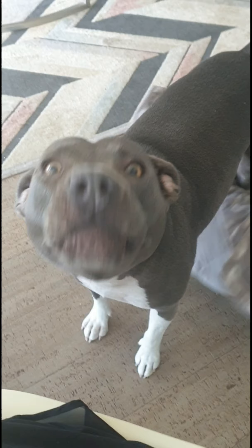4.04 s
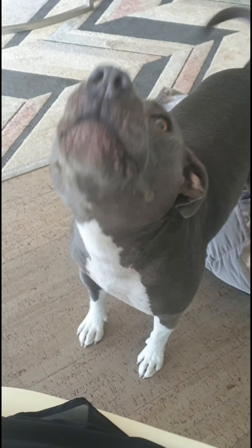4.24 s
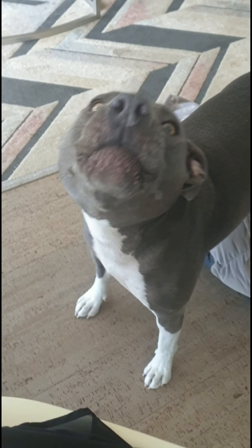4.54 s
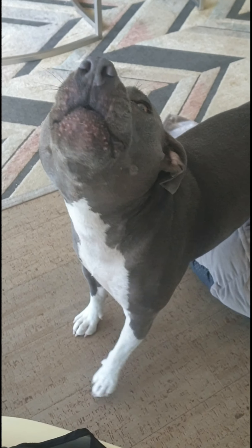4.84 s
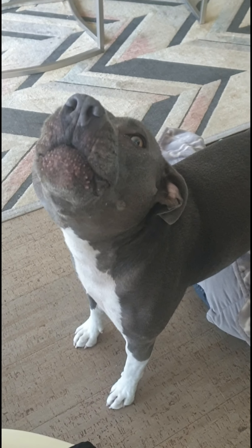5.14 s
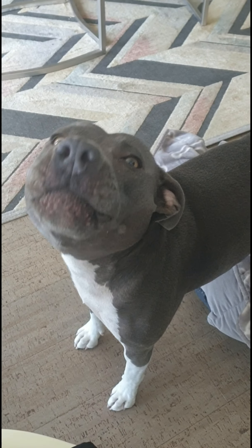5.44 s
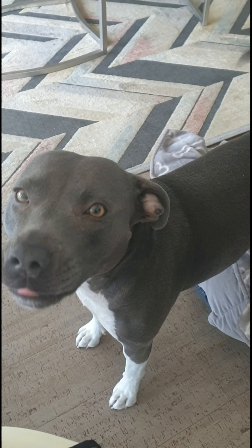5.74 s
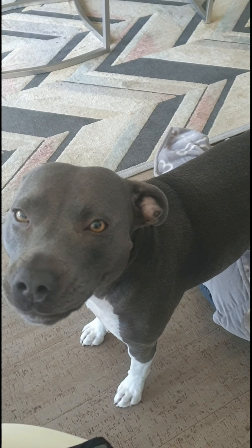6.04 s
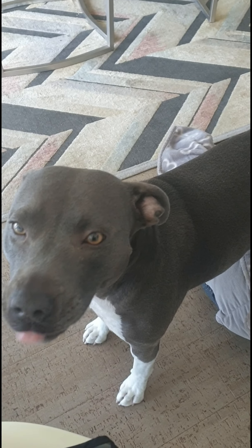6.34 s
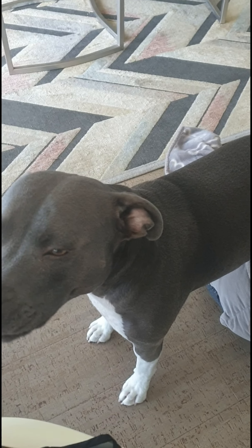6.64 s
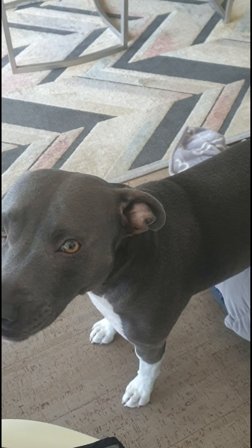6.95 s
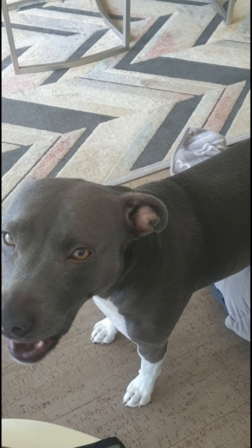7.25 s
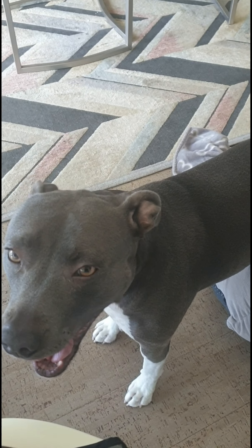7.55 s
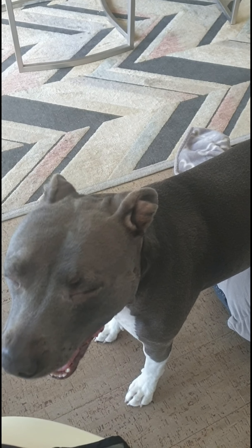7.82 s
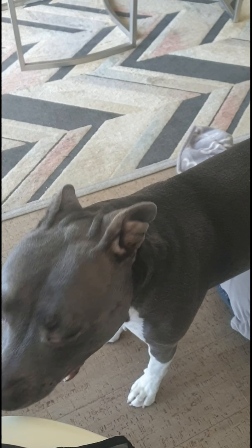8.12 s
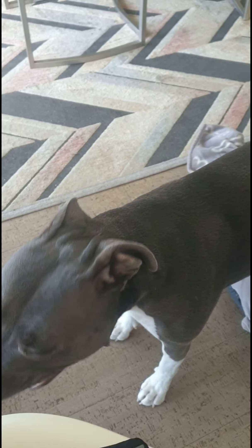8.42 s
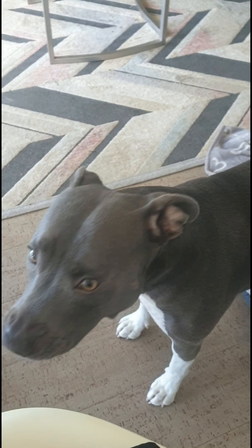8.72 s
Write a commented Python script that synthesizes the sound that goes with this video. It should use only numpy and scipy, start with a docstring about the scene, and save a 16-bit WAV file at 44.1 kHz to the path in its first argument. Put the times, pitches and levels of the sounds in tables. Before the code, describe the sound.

Close, high dog whines and thin nose whistles, one sharp mouth snap, and a quavering howl ending in a snort indoors.

```python
"""Dog whining in a living room.

Close to a phone, a dog whistles thinly through its nose (air jets) and voices high whines, a quick
yodel and a long wavering howl (vocal folds) that turns hoarse and ends in a snort. Air hisses in
its nostrils; it sniffs, licks its lips and snaps its mouth once, sharply. The room rings briefly
over a low rumble."""
import sys
import numpy as np
from scipy import signal
from scipy.fft import rfft, irfft
from scipy.io import wavfile
from scipy.ndimage import uniform_filter1d

SR = 44100
rng = np.random.default_rng(int(sys.argv[2]) if len(sys.argv) > 2 else 0)


def unload_wav(signal):
    """Save mono or channel-first audio to the path in sys.argv[1] as 16-bit WAV at rate SR, clipped to [-1, 1]."""
    wavfile.write(
        sys.argv[1],
        SR,
        np.round(np.clip(np.atleast_2d(signal).T, -1, 1) * 32767).astype(np.int16),
    )


N = 387153
TIME_S = np.arange(N) / SR
BAND_LIMIT_HZ, ATTACK_S = 15400, 0.0033

# Long calls; a quick pitch step is a register break.
# time_s, pitch_hz, level_db, overtones_db, roughness (0-1), left_minus_right_db
CLEAR_WHINE = [(0.748, 952, -13.5, -33.5, 0.08, -15.5), (0.76, 853.4, -14.5, -40.5, 0.01, -18),
               (0.82, 874.4, -14, -21.5, 0.02, -10), (0.85, 889, -28.5, -14.5, 0.03, -10.5),
               (0.89, 892, -20, -19.5, 0.01, -7.5), (0.975, 918, -22, -17, 0, -6.5),
               (1.015, 898, -25.5, -13.5, 0, -8.5), (1.042, 939, -23, -15.5, 0.07, -10),
               (1.057, 1014, -20.5, -35.5, 0, -7)]
YODEL = [(4.107, 901, -37.5, -14, 0.17, 4), (4.147, 896, -39.5, -10, 0.11, 0),
         (4.16, 980, -36.5, -13, 0.037, 8.5), (4.182, 908, -39, -6.5, .06, 6),
         (4.201, 1007, -33, -12, 0.036, 8), (4.216, 914, -34.5, -8, .06, 1),
         (4.232, 1066, -30, -16, 0.098, 17), (4.239, 1184, -27, -16.5, 0.24, -4),
         (4.247, 1136, -29.5, -19.5, 0.14, -9), (4.251, 951, -32.5, -13.5, 0.044, -21),
         (4.266, 989, -27, -17.5, 0.075, -23), (4.27, 1232, -25, -15, 0.09, -2),
         (4.315, 1239, -28.5, -17, 0.074, -2.5), (4.323, 881, -38, -12, 0.097, 3.5),
         (4.385, 864, -38, -11, 0.064, -1), (4.402, 793, -42.5, -8.5, 0.6, 7),
         (4.45, 773, -39.5, -12.5, 1, 0), (4.469, 848, -31, -13, 0.5, 0.5),
         (4.511, 884, -32, -16.5, 0.44, 1), (4.544, 840, -36.5, -18.5, 0.97, 3.5),
         (4.592, 762, -56, 0.5, 0.75, -14)]
HOWL = [(4.588, 739, -37.5, -14, 0.14, -13), (4.618, 714, -38.5, -11, 0.12, 1),
        (4.63, 644.6, -27, -22, 0.055, -5.5), (4.72, 722.5, -26, -24, 0.037, -14.5),
        (4.766, 704, -30, -16.5, 0.067, -10), (4.776, 760, -38.5, -5, 0.47, 4),
        (4.8, 827.4, -26, -15.5, 0.63, 3.5), (4.861, 815.4, -29, -17, 0.866, 3.5),
        (4.976, 823.7, -29, -16.5, 0.58, 3.5), (5.053, 805.5, -28, -16.5, 0.42, 4.5),
        (5.1, 816, -29.5, -12.5, 0.43, 5), (5.146, 810.6, -27, -14, 0.27, 5),
        (5.225, 822.6, -28, -15, 0.34, 3), (5.293, 807, -31, -14, 0.054, 3),
        (5.369, 797, -26.5, -18, 0.045, 6), (5.395, 787, -33.5, -12.5, 0.1, -7),
        (5.412, 640.6, -27.5, -22, 0.048, -5), (5.5, 670, -27.5, -22, 0.021, -7),
        (5.556, 677.4, -26.5, -19, 0.048, -7.5), (5.579, 734.2, -24, -14, 0.14, -8),
        (5.593, 601, -21.5, -24, 0.79, 1), (5.628, 557, -40.5, 2, 0.83, 0)]
# Whimpers and, at 1.061 s, a faint 1250 Hz ring lingering in the room after the whine.
# start_s, length_s, first_hz, middle_hz, last_hz, level_db, change_db, overtones_db,
# roughness (0-1), left_minus_right_db
SHORT_NOTES = [ (0.516, 0.14, 1220, 1289, 1195, -55, -23, -8.5, 0.38, 2.5),
               (0.651, 0.032, 1200, 1110, 1050, -40.5, 13, -19, 0, 12),
               (0.672, 0.061, 922, 916, 878, -24, 1.5, -24.5, 0.01, -3.5),
               (0.729, 0.035, 1064, 1113, 1250, -20.5, 16.5, -31.5, 0.03, -5),
               (1.061, 0.11, 1250, 1243, 1239, -38, -16, -38.5, 0.39, 2),
               (2.188, 0.048, 741, 730, 702, -33, 11, -49, 0.11, -4.5),
               (2.23, 0.0327, 575, 440, 350, -42, -10, -38, 0.65, 0),
               (4.103, 0.049, 1184, 1197, 1130, -39, 11.5, -17, 0.29, -3.5),
               (6.916, 0.14, 947, 935, 916, -31, -5, -22.5, 0, -8.5), ]
# Head pose: start_s, nasal_share (0-1), left_lead_samples
POSTURE = [(0, .55, 20), (2, .8, 6), (4, 0, 7), (6, .9, 20)]
# Overtone colour by exit: freq_hz, gain_db
MOUTH_RESPONSE = [(1300, 5.5), (1750, -6), (2000, -6), (2400, -6.5), (2800, 0.5), (3500, -23.5),
                  (4700, -18.5), (5600, -34.5), (6050, -32), (6500, -23), (7100, -25), (7550, -34),
                  (8000, -15.5), (8600, -19.5), (9300, -15), (9950, -11.5), (10500, -28.5), (11300, -12),
                  (12300, -32.5), (13600, -35), (15000, -45.5)]
NOSE_RESPONSE = [(1300, 5.5), (1850, 15), (2750, 4.5), (3700, 8.5), (4600, -1), (5600, -2.5), (6500, -7.5),
                 (7300, -22), (8400, -15.5), (11000, -24), (13000, -38.5)]
# Airway resonances: centre_hz, width_hz, gain_db
RASP_MODES = [(1280, 430, -13.5), (2268, 140, 0), (3000, 400, -6.5), (3700, 670, -17), (6500, 540, -15),
              (7200, 340, -15.5), (8000, 300, -11.5), (9840, 350, -5), (11200, 530, -17.5),
              (13900, 1200, -27)]
RATTLE_MODES = [(480, 220, 0)]
NASAL_MODES = [(1128, 230, -8), (3027, 250, 2.5), (3800, 400, 9.5), (5050, 600, 4), (6490, 300, -3),
               (14600, 600, -15.5)]

# Rising nose whistle, then from 0.662 s the whine's bright overtone near 5.4 kHz:
# time_s, pitch_hz, level_db
WHISTLE_THEN_OVERTONE = [(0.519, 4645, -75), (0.534, 4617, -51), (0.567, 4541, -48.5), (0.604, 5218, -33.5),
                         (0.622, 5467, -56.5), (0.653, 5868, -45), (0.662, 5690, -61), (0.696, 5420, -45),
                         (0.734, 5120, -43), (0.88, 5411, -60.5)]
# Long nose whistles: time_s, pitch_hz, level_db
STEADY_WHISTLE = [(1.045, 4780, -38.5), (1.053, 4700, -24), (1.081, 4703, -19.5), (1.189, 4642, -29),
                  (1.275, 4720, -34), (1.321, 4828, -27), (1.379, 4846, -37), (1.399, 4853, -31),
                  (1.56, 4894, -53), (1.68, 4844, -75.5)]
WAVERING_WHISTLE = [(3.246, 5170, -54), (3.295, 5030, -28.5), (3.308, 4970, -40), (3.327, 5000, -30),
                    (3.344, 5184, -40), (3.43, 5254, -36.5), (3.485, 5360, -44.5), (3.535, 5210, -28),
                    (3.551, 5220, -31), (3.57, 5116, -21.5), (3.597, 4976, -25), (3.641, 4833, -46.5),
                    (3.671, 4920, -30), (3.721, 4888, -28.5), (3.742, 4420, -57)]
SHORT_WHISTLE = [(6.735, 4850, -56), (6.754, 5090, -35), (6.767, 5140, -31.5), (6.823, 4795, -37),
                 (6.917, 4890, -45), (6.925, 4900, -56)]
# Partials of these four curves, a row each: octave_db, third_re_octave_db
CURVE_PARTIALS = [(-63.5, 12), (-45, 3.5), (-53.5, 4.5), (-66.5, -2)]
# Nose squeaks: start_s, length_s, first_hz, middle_hz, last_hz, level_db, change_db, octave_db
SQUEAKS = [(1.98, 0.25, 4990, 4880, 4840, -59.5, 0, -57), (2.19, 0.044, 4040, 4100, 4210, -56, -11.5, -56),
           (3.195, 0.062, 5340, 5290, 5120, -56.5, -2.5, -78),
           (6.498, 0.031, 5530, 5800, 5660, -53, -10, -77), (6.527, 0.14, 5760, 5800, 5670, -71, -16, -87),
           (6.692, 0.06, 5250, 5050, 4870, -61, 20, -74), (7.335, 0.0435, 5350, 5260, 5090, -55, 22.5, -79),
           (7.953, 0.18, 4830, 4875, 4950, -65, -21.5, -73),
           (8.506, 0.19, 4900, 4844, 4835, -54, -13, -62.5)]

# Nostril breaths: start_s, length_s, hiss_db, change_db, brightness_db, resonance_db
BREATHS = [(0.507, 0.19, -56, -4, 8, -53.5), (0.671, 0.13, -47.5, 0, -1, -58),
           (0.784, 0.44, -64, -13.5, -8, -65), (1.049, 0.32, -67.5, 4, 9, -66.5),
           (1.339, 0.13, -50.5, -6.5, -6.5, -77), (1.461, 0.13, -55, -1, 6, -81),
           (1.957, 0.22, -61, 11.5, 7.5, -75), (2.257, 0.033, -53.5, -12, -4, -61),
           (3.087, 0.14, -69, -9, 9.5, -90), (3.24, 0.44, -61.5, 4, -4, -53.5),
           (3.646, 0.057, -52, 3.5, 11, -52), (6.715, 0.18, -62.5, 2, 0, -54.5),
           (6.906, 0.22, -70, 0, -8, -56), (7.074, 0.26, -63, -16, -11, -62),
           (8.432, 0.27, -68.5, 0.5, 4, -85)]
# Snorts and huffs: peak_s, rise_s, decay_s, push_db, hiss_db
HUFFS = [(2.304, 0.027, 0.063, -52.5, -68), (3.657, 0.0028, 0.0059, -39.5, -51.5),
         (3.756, 0.003, 0.0096, -41.5, -44), (5.561, 0.0077, 0.012, -47, -44),
         (5.616, 0.026, 0.024, -37.5, -37.5)]
# Draughts of air, and at 2.668 s a dull lip smack: peak_s, half_length_s, centre_hz, width_hz, level_db
SNIFFS = [(2.315, 0.052, 3250, 504, -60), (2.32, 0.037, 6240, 1205, -59), (2.668, 0.0035, 1290, 1096, -64),
          (3.196, 0.03, 2460, 1800, -65), (6.554, 0.018, 4146, 940, -56), (7.382, 0.0053, 1030, 493, -54),
          (7.494, 0.056, 1040, 301, -58), (7.849, 0.039, 6460, 297, -67.5), (7.833, 0.017, 7840, 900, -61),
          (7.934, 0.045, 8060, 480, -50.5), (7.892, 0.1, 2770, 1400, -64), (7.932, 0.081, 11900, 1197, -70),
          (8.654, 0.026, 4330, 1200, -69)]
# Airflow spectra: freq_hz, density_db
NOSTRIL_HISS = [(1500, -13), (2500, -7), (4500, -6.5), (6500, -4), (9000, 1.5), (10500, -2.5), (12000, -12),
                (15000, -8.5)]
THROAT_PUSH = [(30, -1), (130, -6), (300, 4), (600, -4), (1300, -14.5), (2000, -26.5), (5000, -25.5)]
SNORT_HISS = [(500, 15), (2500, 5), (3700, 11.5), (4300, -2), (5000, 8), (7300, -1.5), (8200, 8),
              (10500, -0.5), (15000, -5)]

# Mouth clicks: start_s, click_gain_db, knock_db
CLICKS = [(1.074, -24, -47), (1.929, -29, -43), (1.9444, -5.5, -42), (1.977, -34.5, -42),
          (2.656, -63.5, -77), (6.643, -32, -51.5)]
# Modes of a click: freq_hz, gain_db, t60_s
CLICK_MODES = [(3640, -3.5, 0.006), (5455, 4.5, 0.007), (6480, 10.5, 0.0052), (8250, 11.5, 0.0047),
               (9500, -2.5, 0.0045), (13000, -6, 0.0033)]
# Wet crackles: start_s, length_s, max_tick_db
LICKS = [(2.85, 0.33, -64.5), (6.461, 0.19, -61.5), (7.797, 0.25, -56.5)]
# Brief low tonal blip at the start, then two soft bumps: start_s, pitch_hz, peak_db, t60_s
BLIP_AND_BUMPS = [(0.002, 348, -30, 0.08), (2.3, 107, -31.5, 0.03), (2.324, 97, -43, 0.13)]

# Room decay: freq_hz, t60_s
ROOM_DECAY = [(200, .4), (700, 0.52), (1500, 0.75), (5000, 0.41), (9000, 0.43), (15000, 0.15)]
# Background envelope: time_s, gain_db
FLOOR_GAIN = [(0.55, -63), (1.83, -64.5), (3.93, -57.5), (4.09, -60.5), (4.87, -64.5), (5.92, -67),
              (6.69, -58), (7.74, -60), (8.75, -52)]
# Background spectra: freq_hz, density_db
RUMBLE = [(20, -29), (33, -21), (46, 1), (65, -1.5), (110, -7.5), (170, -8.5), (260, -8.5), (450, -20),
          (1200, -58)]
WASH = [(100, -11), (300, 6), (500, 2), (950, 2.5), (1300, -7.5), (1900, -20), (3500, -30.5), (6000, -47.5),
        (11000, -31), (15000, -39.5)]
MUFFLED_RUMBLE = [(20, -43), (54, -1), (93, -7), (137, -7.5), (197, -23.5), (263, -26), (349, -37),
                  (1460, -54), (2730, -60), (12000, -65), (15600, -70), (22000, -120)]


def whine(gate, hz, level_db, overtones_db, rough, pan_db, nasal,
          beat_ratio=0.296, beat_depth=0.59, beat_swing_rad=0.33, rasp_db=-4.5, rattle_db=-8):
    """Vocal folds sing a near sine; under strain a slower vibration beats with it and turns chaotic."""
    size, rough, oral = len(hz), np.clip(rough, 0, 1), 1 - nasal
    hoarse, strain, chaos = np.tanh(3 * rough), np.tanh(9 * rough ** 2), 0.6 * rough ** 2
    hz = hz * (1 + (0.0018 + 0.01 * hoarse) * wander(size, 65))
    # Open mouth: pitch quavers, overtones flutter as the folds close unevenly.
    hz = hz * (1 + 0.007 * oral ** 2 * wander(size, 40))
    overtones_db = overtones_db + 2 * oral * wander(size, 30)
    phase = phase_rad(hz)
    beat = phase_rad(beat_ratio * hz * (1 + 0.37 * rough ** 2 * wander(size, 60)))
    swing_rad = chaos * wander(size, 190) - beat_swing_rad * strain * np.sin(beat)
    swell = 1 + beat_depth * strain * np.cos(beat) + chaos * wander(size, 200)
    loose_phase = phase + (0.03 * oral ** 2 + 0.11 * hoarse) * wander(size, 450)
    overtones = 0
    for k in range(2, 19):
        tract_db = oral * lookup(MOUTH_RESPONSE, k * hz) + nasal * lookup(NOSE_RESPONSE, k * hz)
        flicker_db = 0.45 * min(k, 6) * oral * wander(size, 22)
        loss_db = 2 * rough * max(k - 4, 0) + 4.5 * oral ** 2 * (4 < k < 13)
        gain = amp(tract_db + flicker_db - loss_db) * (k * hz < BAND_LIMIT_HZ)
        overtones += (1 + swell) / 2 * gain * np.cos(k * loose_phase + swing_rad)
    leak = (0.14 * oral + rough) * amp(1.2 * wander(size, 8))
    rasp = amp(rasp_db) * leak * turbulence(RASP_MODES, size, flow=1 + np.cos(phase))
    rattle = amp(rattle_db) * rough ** 2 * turbulence(RATTLE_MODES, size)
    fundamental = np.sqrt(2) * swell * np.cos(phase + swing_rad)
    voice = fundamental + amp(overtones_db) * (overtones + rasp) + rattle
    envelope = gate * amp(level_db + 1.1 * oral * wander(size, 25))
    snout = signal.butter(4, 450, "high", fs=SR, output="sos")  # a small opening radiates little bass
    sides = amp(np.array([[0.5], [-0.5]]) * pan_db)
    return signal.sosfilt(snout, envelope * voice) * sides / np.sqrt((sides ** 2).mean(0))


def voiced_notes(scoop=0.056, scoop_s=0.0058, droop=0.054, droop_s=0.022):
    """Start and controls of each note; short ones drop onto their pitch and sag at the end."""
    for curve in [CLEAR_WHINE, YODEL, HOWL]:
        gate, columns = curve_controls(curve)
        yield curve[0][0], gate, *columns
    for start_s, *shape, overtones_db, rough, pan_db in SHORT_NOTES:
        gate, hz, level_db = note_controls(*shape)
        t = np.arange(len(hz)) / SR
        bend = 1 + scoop * np.exp(-t / scoop_s) - droop * np.exp(-t[::-1] / droop_s)
        yield start_s, gate, hz * bend, level_db, overtones_db, rough, pan_db


def whistle(gate, hz, level_db, octave_db, third_db=-3, pure_above_db=-35, octave_db_per_db=0.25):
    """Air-jet tone: pure when blown hard, sputtering when weak, partials ragged in glides."""
    size = len(hz)
    octave_db = octave_db + octave_db_per_db * (level_db - level_db.mean())
    weakness = 1 / (1 + amp(level_db - pure_above_db) ** 2)
    sputter = 1 + (0.008 + 0.2 * weakness) * (wander(size, 170) + 1j * wander(size, 170))
    glide_hz_per_s = uniform_filter1d(abs(np.gradient(hz)), 1000) * SR
    hz = hz * (1 + 0.001 * wander(size, 90))
    level_db = level_db + 1.5 * wander(size, 32)
    octave_db = octave_db + 1.8 * wander(size, 90) + 2 * wander(size, 18)
    phase = phase_rad(hz)
    ragged_phase = phase + (0.05 + 0.14 * np.minimum(glide_hz_per_s / 3000, 1)) * wander(size, 350)
    third = amp(third_db) * formants(NASAL_MODES, 3 * hz) * np.cos(3 * ragged_phase)
    tone = amp(level_db) * (sputter * np.exp(1j * phase)).real
    return np.sqrt(2) * gate * (tone + amp(octave_db) * (np.cos(2 * ragged_phase) + third))


def high_tones(long_gain_db=2):
    """Near 5 kHz: long nose whistles, brief squeaks and the whine's bright overtone."""
    out = np.zeros(N)
    curves = [WHISTLE_THEN_OVERTONE, STEADY_WHISTLE, WAVERING_WHISTLE, SHORT_WHISTLE]
    for curve, partials_db in zip(curves, CURVE_PARTIALS):
        gate, (hz, level_db) = curve_controls(curve)
        add(out, curve[0][0], whistle(gate, hz, level_db + long_gain_db, *partials_db))
    for start_s, *shape, octave_db in SQUEAKS:
        add(out, start_s, whistle(*note_controls(*shape), octave_db))
    return out


def breaths(attack_s=0.032, release_db_per_s=194.5, flutter_db=1.1,
            bright_hz=8040, ripple_hz=220, flare=0.011):
    """Turbulent hiss at the nostrils, resonances behind them; the colour shifts as they flare."""
    out = np.zeros(N)
    for start_s, length_s, hiss_db, change_db, bright_db, resonance_db in BREATHS:
        t = np.arange(0, length_s + 0.43, 1 / SR)
        hz = np.fft.rfftfreq(len(t), 1 / SR)
        progress, hiss = np.minimum(t / length_s, 1), 0
        for fade in np.sqrt([1 - progress, progress]):  # crossfade of two hollow colours
            ripple_db = np.interp(hz / ripple_hz, np.arange(256), rng.uniform(-11, 5.5, 256))
            colour_db = lookup(NOSTRIL_HISS, hz) + bright_db * hz / bright_hz + ripple_db
            hiss += fade * coloured(rng.standard_normal(len(t)), amp(colour_db))
        passages = [(f * (1 + flare * rng.uniform(-1, 1)), width, db) for f, width, db in NASAL_MODES]
        air = amp(hiss_db) * hiss + amp(resonance_db) * turbulence(passages, len(t))
        gain_db = change_db * (progress - 0.5) - release_db_per_s * np.maximum(t - length_s, 0)
        gain_db += flutter_db * wander(len(t), 35)
        add(out, start_s, np.minimum(t / attack_s, 1) * amp(gain_db) * air)
    return out


def huffs():
    """Air bursts: low push from the throat, hiss from the nose."""
    push, hiss, out = noise(THROAT_PUSH), noise(SNORT_HISS), np.zeros(N)
    for peak_s, rise_s, decay_s, push_db, hiss_db in HUFFS:
        t = TIME_S - peak_s
        envelope = np.exp(-np.where(t < 0, (t / rise_s) ** 2, t / decay_s))
        out += envelope * (amp(push_db) * push + amp(hiss_db) * hiss)
    return out


def sniffs(sputter_db=4):
    """Short draughts, and one dull lip smack, each sputtering through one narrow, wet passage."""
    out = np.zeros(N)
    for peak_s, half_s, hz, width_hz, level_db in SNIFFS:
        t = np.arange(-3 * half_s, 3 * half_s, 1 / SR)
        b, a = signal.iirpeak(hz, hz / width_hz, fs=SR)
        air = signal.lfilter(b, a, signal.lfilter(b, a, rng.standard_normal(len(t))))
        air *= amp(sputter_db * wander(len(t), 70))
        add(out, peak_s + t[0], amp(level_db) * unit_rms(air) * np.exp(-(t / half_s) ** 2))
    return out


def mouth_clicks(base_db=-16, knock_t60_s=0.041, splash=0.12, splash_t60_s=0.028):
    """Teeth and lips snap: bright damped modes, a noise splash, a dull jaw knock."""
    out, t = np.zeros(N), np.arange(SR // 20) / SR
    low_noise = noise(THROAT_PUSH)
    for start_s, click_db, knock_db in CLICKS:
        ring = sum((-1) ** k * amp(db - 60 * t / t60_s) * np.sin(2 * np.pi * hz * t)
                   for k, (hz, db, t60_s) in enumerate(CLICK_MODES))
        ring += splash * rng.standard_normal(len(t)) * amp(-60 * t / splash_t60_s)
        knock = low_noise[round(start_s * SR):][:len(t)] * amp(knock_db - 60 * t / knock_t60_s)
        add(out, start_s, amp(base_db + click_db) * ring / abs(ring).max() + knock)
    return out


def licks(ticks_per_lick=26, centre_hz=9100, t60_s=0.01, range_db=20):
    """Saliva films burst on lips and tongue: tiny ticks of uneven size and pitch."""
    out, t = np.zeros(N), np.arange(SR // 100) / SR
    for start_s, length_s, max_db in LICKS:
        for when, pitch, softness in rng.random((ticks_per_lick, 3)):
            hz = centre_hz * 2 ** (pitch - 0.5)
            tick = turbulence([(hz, hz / 2, 0)], len(t)) * amp(-60 * t / t60_s)
            add(out, start_s + when * length_s, amp(max_db - range_db * softness) * tick)
    return out


def blip_and_bumps():
    """Low opening blip and soft bumps, one damped tone each."""
    out, t = np.zeros(N), np.arange(SR // 5) / SR
    for start_s, hz, peak_db, t60_s in BLIP_AND_BUMPS:
        add(out, start_s, amp(peak_db - 60 * t / t60_s) * np.sin(2 * np.pi * hz * t))
    return out


def room(x, gap_s=0.0031, echoes_per_s=3000, coherent_hz=450):
    """Sparse echoes off floor, walls and furniture; decay varies by band, bass alike on both sides."""
    taps = rng.choice([-1., 1.], (2, SR)) * (rng.random((2, SR)) < echoes_per_s / SR)
    taps *= np.arange(SR) > gap_s * SR
    hz, t, (left, right) = signal.stft(taps, SR, nperseg=256)
    coherence = np.exp(-(hz[:, None] / coherent_hz) ** 2)
    right = coherence * left + np.sqrt(1 - coherence ** 2) * right
    decay = amp(-60 * t / lookup(ROOM_DECAY, hz)[:, None])
    tail = signal.istft(np.array([left, right]) * decay, SR, nperseg=256)[1]
    return signal.fftconvolve(x[None], tail / np.linalg.norm(tail[0]), axes=1)[:, :N]


def background(rumble_gain_db=2, muffled_db=-48.5, muffled_until_s=0.515):
    """Muffled at first, then a near-mono low rumble under a soft diffuse wash."""
    rumble = stereo_noise(RUMBLE, spread=0.2)
    wash = unit_rms(stereo_noise(WASH, spread=1.9))
    rumble *= amp(rumble_gain_db + 1.5 * wander(N, 8))
    wash *= amp(0.57 * wander(N, 16))
    floor = amp(np.interp(TIME_S, *np.transpose(FLOOR_GAIN))) * (rumble + wash)
    muffled = amp(muffled_db) * stereo_noise(MUFFLED_RUMBLE, spread=0.3)
    opened = np.clip((TIME_S - muffled_until_s) / ATTACK_S, 0, 1)
    return opened * floor + (1 - opened) * muffled


def curve_controls(rows, fade_s=0.0045):
    """Soft-ended gate and a curve's columns per sample."""
    times_s, *columns = np.transpose(rows)
    t = np.arange(times_s[0], times_s[-1], 1 / SR)
    gate = np.clip(np.minimum(t - t[0], t[-1] - t) / fade_s, 0, 1)
    return gate, [np.interp(t, times_s, column) for column in columns]


def note_controls(length_s, first_hz, middle_hz, last_hz, level_db, change_db,
                  release_s=0.0065, swell_db=4.5):
    """Gate, parabolic pitch and sloping level with a mid-note swell."""
    t = np.arange(0, length_s, 1 / SR)
    progress = t / length_s
    bow = 4 * progress * (1 - progress)
    hz = first_hz + (last_hz - first_hz) * progress + (middle_hz - (first_hz + last_hz) / 2) * bow
    gate = np.clip(np.minimum(t / ATTACK_S, (length_s - t) / release_s), 0, 1)
    return gate, hz, level_db + change_db * (progress - 0.5) + swell_db * (bow - 0.5)


def turbulence(modes, size, flow=1):
    """Steady or flow-pulsed noise in a resonant passage, rms 1."""
    return coloured(flow * rng.standard_normal(size), formants(modes, np.fft.rfftfreq(size, 1 / SR)))


def formants(modes, hz):
    """Gain of a set of resonances."""
    return np.sqrt(sum((amp(db) / (1 + (2 * (hz - f) / width) ** 2)) ** 2 for f, width, db in modes))


def noise(spectrum):
    """Scene-long coloured noise, rms 1."""
    return coloured(rng.standard_normal(N), amp(lookup(spectrum, np.fft.rfftfreq(N, 1 / SR))))


def stereo_noise(spectrum, spread):
    """Common noise plus an independent part per side."""
    return noise(spectrum) + spread * np.array([noise(spectrum), noise(spectrum)])


def coloured(x, gains):
    """FFT filter, output rms 1."""
    return unit_rms(irfft(rfft(x) * gains, len(x)))


def wander(size, rate_hz):
    """Low-passed random drift, rms about 1."""
    lowpass = signal.butter(4, rate_hz, fs=SR, output="sos")
    return unit_rms(signal.sosfilt(lowpass, rng.standard_normal(size + SR // 4)))[-size:]


def lookup(points, hz):
    """Table value on a log-frequency axis."""
    table_hz, values = np.transpose(points)
    return np.interp(np.log(hz + 1), np.log(table_hz), values)


def phase_rad(hz):
    return 2 * np.pi * np.cumsum(hz) / SR


def amp(db):
    return 10 ** (np.asarray(db) / 20)


def unit_rms(x):
    return x / np.sqrt(np.mean(abs(x) ** 2) + 1e-20)


def add(mix, start_s, sound):
    part = mix[..., round(start_s * SR):][..., :sound.shape[-1]]
    part += sound[..., :part.shape[-1]]


def mic_delays(pair, lag_samples):
    """Arrival lags at the left and right microphones."""
    return np.array([np.pad(x, (lag, 0))[:len(x)] for x, lag in zip(pair, lag_samples)])


def scene(voice_send_db=-15, high_send_db=-13, air_send_db=-4, burst_send_db=-7):
    """The dog near the phone, turning its head between calls; the room around it."""
    voice, direct = np.zeros((2, N)), np.zeros((2, N))
    for start_s, *controls in voiced_notes():
        _, nasal, lead_samples = [pose for pose in POSTURE if pose[0] <= start_s][-1]
        note = whine(*controls, nasal)
        add(voice, start_s, note)
        add(direct, start_s, mic_delays(note, (0, lead_samples)))
    highs = high_tones()
    air = breaths() + sniffs()
    bursts = huffs() + mouth_clicks() + licks()
    direct += mic_delays(highs * amp([[-2.8], [1.6]]), (3, 0))  # nose nearer the right microphone
    direct += (air + bursts) * amp([[-1.6], [0.8]]) + blip_and_bumps()
    off_axis = signal.butter(2, 1400, fs=SR, output="sos")  # overtones beam forward, stir the room less
    send = amp(voice_send_db) * signal.sosfilt(off_axis, voice.mean(0))
    send += amp(high_send_db) * highs + amp(air_send_db) * air + amp(burst_send_db) * bursts
    return direct + room(send) + background()


def record(dry):
    """The phone's band limit."""
    lowpass = signal.firwin(511, BAND_LIMIT_HZ, window=("kaiser", 9), fs=SR)
    return signal.oaconvolve(dry, lowpass[None], "same")


dry = scene()
out = record(dry)
unload_wav(out)
```